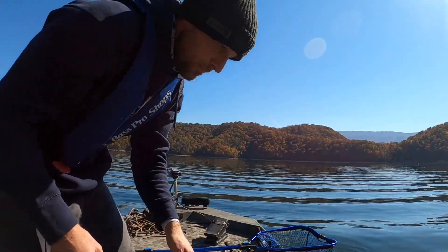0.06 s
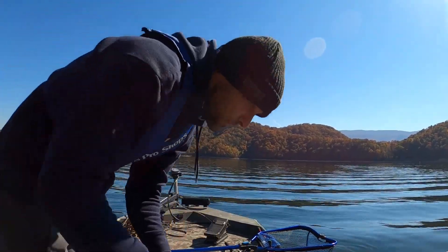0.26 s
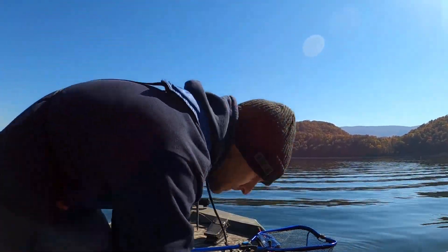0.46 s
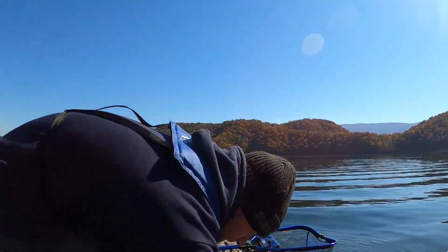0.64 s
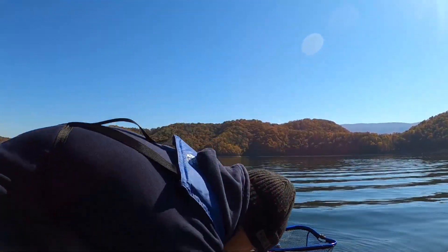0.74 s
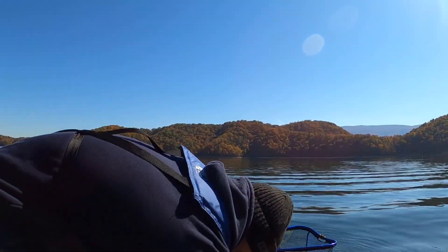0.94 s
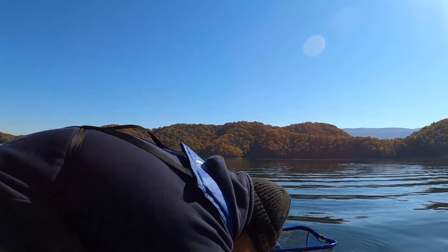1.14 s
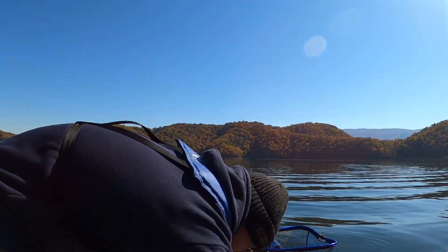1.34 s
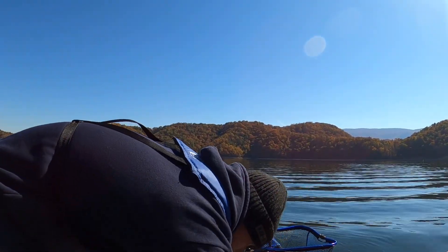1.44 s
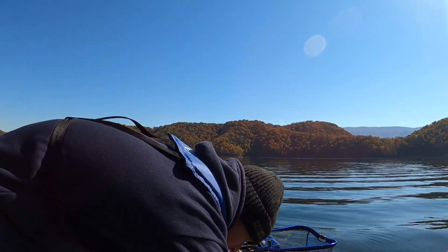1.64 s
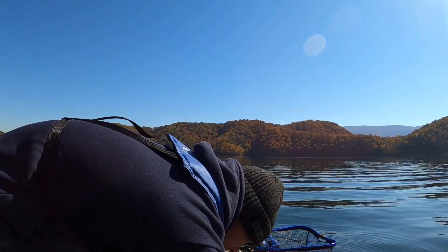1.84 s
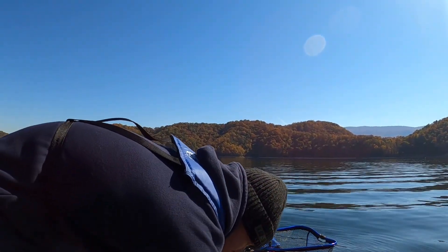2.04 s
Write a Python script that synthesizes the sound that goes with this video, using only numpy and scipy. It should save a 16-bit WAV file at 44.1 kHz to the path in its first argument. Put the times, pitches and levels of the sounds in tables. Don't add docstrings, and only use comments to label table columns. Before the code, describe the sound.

Hollow, heavy thumps with hard cracks as gear is shifted in a small boat, then brief hissing rubs and squeaks, over faint motor hum and cloth rustle on a calm lake, heard close in stereo.

```python
import sys
import numpy as np
from scipy import signal
from scipy.fft import rfft, irfft, next_fast_len
from scipy.io import wavfile
from scipy.ndimage import uniform_filter1d, map_coordinates

SR = 44100
rng = np.random.default_rng(int(sys.argv[2]) if len(sys.argv) > 2 else 0)


def magnitude_from_level(level_db):
    exponent = np.asarray(level_db, float) / 20
    return 10 ** exponent


def unload_wav(signal):
    wavfile.write(
        sys.argv[1],
        SR,
        np.round(np.clip(np.atleast_2d(signal).T, -1, 1) * 32767).astype(np.int16),
    )


N = 92610


def unit(x):
    return x / np.sqrt(np.mean(x ** 2) + 1e-20)


def along(points, hz):
    point_hz, value = np.transpose(points)
    return np.interp(np.log(hz + 1), np.log(point_hz + 1), value)


def over_time(rows):
    return np.interp(np.arange(N) / SR, *np.transpose(rows))


def wobble(rate_hz, size=N):
    knots = rng.standard_normal(int(size * rate_hz / SR) + 4)
    return map_coordinates(knots, [np.arange(size) * rate_hz / SR])


def swept_phase(hz):
    return 2 * np.pi * np.cumsum(hz) / SR


def filtered(x, response):
    m = next_fast_len(x.shape[-1] + 8192)
    hz = np.fft.rfftfreq(m, 1 / SR)
    return irfft(rfft(x, m) * response(hz), m)[..., :x.shape[-1]]


def rush(spectrum, alike, patchy_db):
    z = signal.stft(rng.standard_normal((2, N)), nperseg=512)[2]
    patches = uniform_filter1d(rng.standard_normal(z.shape[1:]), size=6, axis=0)
    patches = uniform_filter1d(patches, size=8, axis=1)
    pair = signal.istft(z * magnitude_from_level(patchy_db * unit(patches)), nperseg=512)[1][:, :N]

    def response(hz):
        angle = np.arccos(np.clip(along(alike, hz), -1, 1)) / 2
        return magnitude_from_level(along(spectrum, hz)) * [np.cos(angle), np.sin(angle)]

    mid, side = filtered(pair, response)
    return unit(np.array([mid + side, mid - side]))


def add(out, start_s, x):
    k = round(start_s * SR)
    out[..., k:k + x.shape[-1]] += x[..., :N - k]


# start_s, level_db
RUSTLE_LEVEL = [(0, -52), (.08, -57), (.3, -55), (.45, -55.5), (.75, -55), (.9, -55), (1.1, -55.5),
                (1.3, -56), (1.53, -59), (1.72, -51), (1.85, -55.5), (1.98, -56), (2.1, -52.5)]
# pitch_hz, level_db (per Hz)
RUSTLE_TONE = [(240, -49), (400, -6), (800, -12.5), (1070, -6.5), (4700, -21), (9000, -39.5), (13900, -58)]
# start_s, level_db
NYLON_LEVEL = [(0, -74.5), (.33, -70.5), (.4, -70), (.44, -74.5), (1.0, -74), (1.3, -83), (2.1, -84)]
# pitch_hz, level_db (per Hz)
NYLON_TONE = [(3000, -47), (7000, -8.5), (12500, -24), (14000, -50)]
# pitch_hz, likeness (0 to 1)
CLOTH_ALIKE = [(60, 0.72), (230, 0.9), (900, 0.72), (3480, 0.074), (13500, 0.04)]


def cloth_and_air():
    rustle_gain = magnitude_from_level(over_time(RUSTLE_LEVEL) + 0.8 * wobble(25))
    rustle = rustle_gain * rush(RUSTLE_TONE, CLOTH_ALIKE, patchy_db=0.7)
    fizz = magnitude_from_level(over_time(NYLON_LEVEL)) * rush(NYLON_TONE, CLOTH_ALIKE, patchy_db=3.0)
    return rustle + fizz


# start_s, level_db
BREEZE_LEVEL = [(0, -56.5), (.35, -48.5), (.7, -42), (.93, -57.5), (1.04, -60.5), (1.14, -73), (1.22, -67),
                (1.4, -61), (1.6, -55), (1.73, -51), (1.82, -53), (1.9, -49.5), (2, -60), (2.1, -51)]
# pitch_hz, level_db (per Hz)
BREEZE_TONE = [(12, -10), (25, -5), (60, -10.5), (110, -4), (200, -78.5)]
# pitch_hz, level_db (per Hz)
RUMBLE_TONE = [(53, -33), (90, -18), (151, -1.5), (227, -5), (400, -10.5), (520, -24), (880, -120)]


def breeze_and_rumble():
    breeze_db = over_time(BREEZE_LEVEL)
    breeze = magnitude_from_level(breeze_db + wobble(11)) * rush(BREEZE_TONE, [(40, 0.28), (100, 0.88)], patchy_db=0.0)
    rumble_db = -56 + 0.1 * (breeze_db + 73.0) + 0.5 * wobble(6.4)
    return breeze + magnitude_from_level(rumble_db) * rush(RUMBLE_TONE, [(100, 0.91)], patchy_db=0.1)


# pitch_hz, level_db, wander_hz
MOTOR_NOTES = [
    (153.6, -55, 7.5),
    (306.5, -66, 15),
]
# start_s, level_db
MOTOR_SWELL = [(0, -2), (.9, 0.5), (1.1, 1), (1.16, -8.5), (1.22, 0), (1.3, -0.5), (1.5, 1), (1.7, -0.5),
               (1.76, 2), (1.899, -2.5), (1.96, -3.5), (2.1, -4.5)]


def far_motor():
    swell_db = over_time(MOTOR_SWELL)
    out = 0
    for hz, db, wander_hz in MOTOR_NOTES:
        gain = magnitude_from_level(db + swell_db + 7.5 + 3.6 * wobble(22.17))
        out = out + gain * np.sin(swept_phase(hz + wander_hz * wobble(25.016)))
    return out


# start_s, level_db, spacing_s (between pulses)
CHIRPS = [(.122, -63, .037), (.390, -64, .038), (.838, -61, .035), (1.052, -62, .037), (1.486, -63, .037),
          (2.041, -61, .032)]
CHIRP_PULSES_DB = [-5, -2, 0]


def cricket():
    pulse_s, pitch_hz, droop = 0.024, 4800, 650000
    out = np.zeros((2, N))
    t = np.arange(round(pulse_s * SR)) / SR
    for start_s, db, spacing_s in CHIRPS:
        for k, pulse_db in enumerate(CHIRP_PULSES_DB):
            phase = 2 * np.pi * (pitch_hz * rng.normal(1, 0.006) * t - droop * t ** 3 / 3)
            gain = magnitude_from_level(db + pulse_db + 5.5 + 1.2 * wobble(230, size=len(t)))
            swell = np.sin(np.pi * t / pulse_s)
            pulse = gain * swell * np.sin(phase + np.array([[0], [0.8]]))
            add(out, min(start_s + k * spacing_s, N / SR), pulse)
    return out


# start_s, pitch_hz, level_db
STRAP_RUN = [(.30, 3500, -78), (.335, 3800, -67), (.36, 4700, -63), (.372, 5000, -70), (.382, 5600, -62),
             (.395, 6500, -72)]


def strap():
    octave_db, jitter = -12, 0.035
    s, hz, db = np.transpose(STRAP_RUN)
    t = np.arange(s[0], s[-1], 1 / SR)
    out = np.zeros((2, N))
    phase = swept_phase(np.interp(t, s, hz) * (1 + jitter * wobble(370, size=len(t))))
    turn = np.array([[0], [0.8]])
    whistle = np.sin(phase + turn) + magnitude_from_level(octave_db) * np.sin(2 * phase - turn)
    add(out, s[0], magnitude_from_level(np.interp(t, s, db) + 2.6 * wobble(193, size=len(t))) * whistle)
    return out


# start_s, level_db, pitch_hz (centre), fade_s (to fall 60 dB)
BUCKLE_TICKS = [(.204, -53, 9000, .01), (.2195, -50, 7200, 0.024), (0.2213, -41, 2500, 0.11),
                (0.258, -56, 6000, 0.022), (.3994, -55.5, 8500, 0.04), (0.5062, -35.5, 2800, 0.011),
                (0.5064, -53, 7500, 0.01), (0.512, -46.5, 9500, 0.0047), (0.545, -62, 6000, 0.0081),
                (0.561, -61.5, 5770, 0.066), (0.7368, -53.5, 6000, 0.017), (1.384, -45, 2980, 0.08),
                (1.567, -50, 1500, 0.043), (1.701, -66, 8000, 0.025), (1.77, -57.5, 7440, 0.013),
                (1.769, -44.5, 2200, 0.018), (1.8865, -58.5, 5800, 0.024), (0.629, -45, 3770, 0.11),
                (.2195, -44, 1590, 0.11), (2.0468, -63, 6000, 0.028)]


def ticks():
    width_octaves, rise_s = 0.65, 0.0012
    out = np.zeros((2, N))
    t = np.arange(SR // 10) / SR
    for start_s, db, pitch_hz, fade_s in BUCKLE_TICKS:
        a, b = rng.standard_normal((2, len(t)))
        pair = np.array([a + 0.55 * b, a - 0.58 * b])
        pair = filtered(pair, lambda hz: np.exp(-(np.log2((hz + 1) / pitch_hz) / width_octaves) ** 2))
        add(out, start_s, magnitude_from_level(db - 60 * t / fade_s) * unit(pair) * (1 - np.exp(-t / rise_s)))
    return out


# start_s, hiss_db, pitch_hz (slips a second), squeak_db
RUB_STROKES = [
    [(1.12, -52.5, 482, -89), (1.145, -47, 507.5, -86), (1.195, -40, 504, -77), (1.23, -47, 512, -63),
     (1.26, -56.5, 522, -57)],
    [(1.376, -81, 587, -101), (1.385, -49.5, 764.3, -66), (1.402, -39, 756, -64), (1.422, -44.5, 785, -54),
     (1.433, -41, 757, -51), (1.442, -43, 729, -37.5), (1.450, -47, 579, -52.5), (1.458, -46.5, 531, -37),
     (1.468, -51, 514, -53.5), (1.482, -55, 450, -54)],
    [(1.566, -51, 570, -103), (1.585, -47.5, 664.3, -45), (1.597, -39, 940.6, -53), (1.608, -46, 1128, -34),
     (1.62, -42.5, 1090, -47.5), (1.638, -40.5, 934.5, -40), (1.651, -46, 766, -41), (1.657, -44, 333, -38),
     (1.672, -54, 263, -70)],
    [(1.715, -60, 1037, -64), (1.728, -52, 1154, -50), (1.742, -51, 1110, -71), (1.762, -71, 1070, -59)],
]
STROKE_SLOPES_DB = [-2, 0, 0, -6]
# pitch_hz, level_db (per Hz)
HISS_TONE = [(120, -9), (250, -12), (970, -5.5), (2000, -11), (6000, -24), (10000, -39.5), (13900, -50)]
# multiple (of the slip rate), level_db
SQUEAK_OVERTONES = [(1, 0), (2, -7), (3, -12), (4, -12), (5, -15), (6, -16), (7, -18), (8, -21)]


def rubbing():
    jitter, catch_db, grit_db = 0.03, 3.3, 1.3
    bright_db = 3
    dull_hz, dull_db = 5000, 30
    out = np.zeros((2, N))
    hiss = rush(HISS_TONE, [(300, 1.0), (3000, 0.78), (10000, 0.084)], patchy_db=1)
    for rows, slope_db in zip(RUB_STROKES, STROKE_SLOPES_DB):
        s, hiss_points, hz_points, squeak_points = np.transpose(rows)
        k = np.arange(round(s[0] * SR), round(s[-1] * SR))
        hiss_db = np.interp(k / SR, s, hiss_points)
        slip_hz = np.interp(k / SR, s, hz_points)
        squeak_db = np.interp(k / SR, s, squeak_points)
        phase = swept_phase(slip_hz * (1 + jitter * wobble(503.5, size=len(k))))
        bright = bright_db * np.clip(-52.0 - squeak_db, -3, 5) / 10
        squeak = 0
        for m, db in SQUEAK_OVERTONES:
            dull = dull_db * np.log2(np.maximum(1, m * slip_hz / dull_hz))
            tone_db = db + (slope_db + bright) * np.log2(m) - dull
            catch = catch_db * wobble(138.0, size=len(k))
            squeak = squeak + magnitude_from_level(tone_db + catch) * np.sin(m * phase)
        rub = magnitude_from_level(hiss_db + grit_db * wobble(503, size=len(k))) * hiss[:, k]
        rub = rub + magnitude_from_level(squeak_db + 5.5) * squeak
        out[:, k] += rub * signal.windows.tukey(len(k), 0.1)
    return out * magnitude_from_level([[0.3], [-0.3]])


# (to fall 60 dB, at 1 kHz)
EDGE_CRACKS = [(.219, -25.5, 1270, 0.2), (0.26, -39, 1100, 0.14), (0.29, -37, 1170, 0.063),
               (0.338, -34, 800, 0.028), (0.396, -49, 4520, 0.38), (.507, -42.5, 933, 0.03),
               (.558, -31.5, 753, 0.24), (0.632, -33.5, 1210, 0.21), (.631, -38.5, 3960, 0.2),
               (0.754, -51.5, 3120, 0.068), (1.689, -59, 1980, 0.2), (1.789, -34.5, 2990, 0.095)]


def cracks():
    width_octaves, treble_fall_db, fade_slope = 1, 18, 0.75
    hollow_hz, hollow_db = 800, -5
    rise_s, snap_s = 0.00077, 0.0056
    out = np.zeros((2, N))
    band_hz = 250 * 2 ** (np.arange(13) / 2)
    t = np.arange(SR // 3) / SR
    for start_s, db, pitch_hz, fade_s in EDGE_CRACKS:
        a, b = rng.standard_normal((2, len(t)))
        pair = np.array([a + 0.26 * b, a - 0.3 * b])
        burst = 0
        for k, hz in enumerate(band_hz):
            limits = [hz / 1.19, min(hz * 1.19, 20000)]
            band = signal.sosfilt(signal.butter(2, limits, "band", fs=SR, output="sos"), pair)
            gain_db = -11 * np.log(1 + (np.log2(hz / pitch_hz) / width_octaves) ** 2)
            gain_db -= treble_fall_db * max(0, np.log2(hz / 5000))
            gain_db += hollow_db * np.exp(-(3 * np.log2(hz / hollow_hz)) ** 2)
            band_fade_s = fade_s * (1000 / hz) ** fade_slope
            fade = magnitude_from_level(-60 * t / band_fade_s) + 0.5 * magnitude_from_level(-60 * t / snap_s)
            burst = burst + (-1) ** k * unit(band) * magnitude_from_level(gain_db) * fade
        add(out, start_s, magnitude_from_level(db - 7 + np.array([[0.6], [-0.6]])) * burst * (1 - np.exp(-t / rise_s)))
    return out


# start_s, level_db (peak),
# pitch_hz, fade_s (to fall 60 dB)
PANEL_THUMPS = [(0.2187, -12.5, 192.2, 0.08), (.22, -29, 479.5, 0.15), (0.224, -29.5, 64.2, 0.18),
                (0.247, -24, 156.4, 0.19), (0.278, -13.5, 145, 0.019), (.298, -15.5, 122, 0.073),
                (0.296, -23.5, 76.3, 0.37), (.313, -21, 128.3, 0.4), (0.334, -16, 136, 0.1),
                (.364, -21, 129.2, 0.25), (0.379, -29.5, 138, 0.14), (0.408, -39, 193.3, 0.29),
                (0.46, -44, 68, 1), (0.5648, -19.5, 110.6, 0.25), (.562, -41.5, 535, .15),
                (0.566, -43, 1100, 0.22), (0.5600, -19, 213, 0.043), (0.6337, -13.5, 144, 0.049),
                (0.604, -25, 108.7, 0.34), (.650, -26.5, 167.5, 0.12), (0.687, -21.5, 108, 0.097),
                (0.733, -36.5, 173, 0.2), (0.768, -38, 99.8, 0.23), (.803, -35, 154.4, 0.11),
                (1.025, -48.5, 77, 0.2), (1.1, -44, 92, 0.12), (1.331, -36, 128, 0.066),
                (1.35, -39, 97, 0.17), (1.476, -40.5, 203, 0.028), (1.737, -38.5, 145.6, 0.071),
                (1.865, -44.5, 84, 0.32)]
# pitch_hz, level_db, fade_s (to fall 60 dB)
HULL_NOTES = [(245, -12, 0.21), (343, -6.5, 0.2), (428.7, -7, 0.083), (477, -15.5, 0.098),
              (554, -15.5, 0.14), (665, -18.5, 0.21), (1045, -19.5, 0.09), (1318, -25, 0.089),
              (1480, -13, 0.03)]


def thumps():
    rise_cycles, hull_db, hard_db = 0.35, -12, 16.5
    out = np.zeros(N)
    t = np.arange(SR // 2) / SR
    note_hz, note_db, ring_s = np.transpose(HULL_NOTES)[..., None]
    for start_s, db, pitch_hz, fade_s in PANEL_THUMPS:
        gain = magnitude_from_level(note_db + rng.normal(0, 2.84, note_hz.shape) - 60 * t / ring_s)
        hz = note_hz * rng.normal(1, 0.019, note_hz.shape)
        hull = (gain * np.sin(2 * np.pi * hz * t)).sum(axis=0) * (1 - np.exp(-t / 0.0036))
        hull_gain = magnitude_from_level(hull_db + hard_db * min(0.5, np.log2(pitch_hz / 150)))
        panel = magnitude_from_level(4.5 - 60 * t / fade_s) * np.sin(2 * np.pi * pitch_hz * t)
        panel = panel * (1 - np.exp(-(t * pitch_hz / rise_cycles) ** 1.5))
        add(out, start_s, -magnitude_from_level(db) * (panel + hull_gain * hull))
    return out


def hull_blur(x):
    level_db, fade_s = -22, 0.31
    t = np.arange(SR // 4) / SR
    tail = rng.standard_normal((2, len(t))) * magnitude_from_level(-60 * t / fade_s)
    tail = tail / np.linalg.norm(tail[0])
    return magnitude_from_level(level_db) * signal.fftconvolve(x[None], tail, axes=1)[:, :N]


def scene():
    lake = cloth_and_air() + breeze_and_rumble() + far_motor() + cricket()
    contacts = thumps()
    return lake + strap() + ticks() + rubbing() + cracks() + contacts + hull_blur(contacts)


def low_pass(x):
    return signal.sosfilt(signal.butter(12, 14070, fs=SR, output="sos"), x)


# pitch_hz, level_db
LEFT_LEAN = [(100, 0.7), (2000, 3), (8000, 1.5), (13000, -3)]


def record(dry):
    lag_s = 5e-5
    side = np.array([[1], [-1]])

    def response(hz):
        lag = lag_s / (1 + (hz / 4000) ** 2)
        return magnitude_from_level(side * along(LEFT_LEAN, hz) / 2) * np.exp(-1j * np.pi * hz * lag * side)

    return low_pass(filtered(dry, response))


dry = scene()
out = record(dry)
unload_wav(out)
```